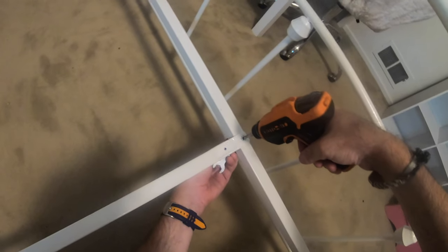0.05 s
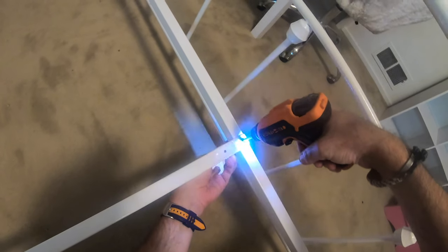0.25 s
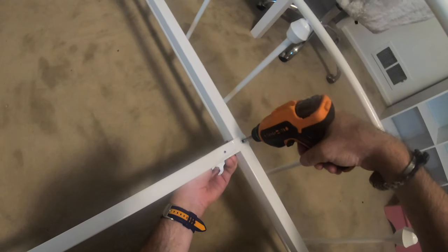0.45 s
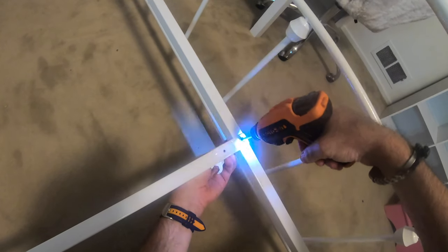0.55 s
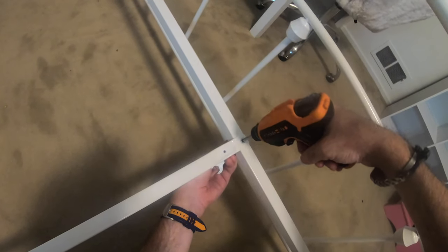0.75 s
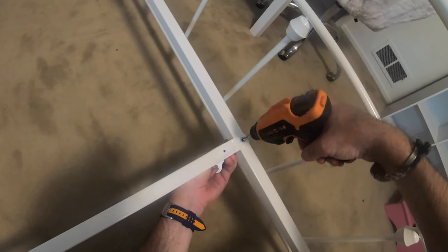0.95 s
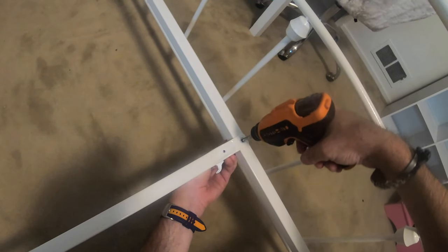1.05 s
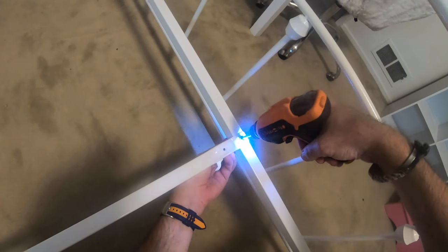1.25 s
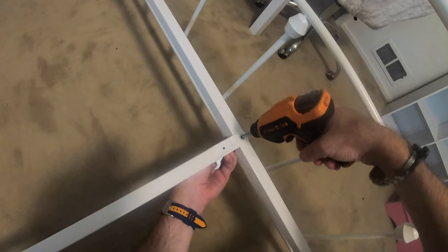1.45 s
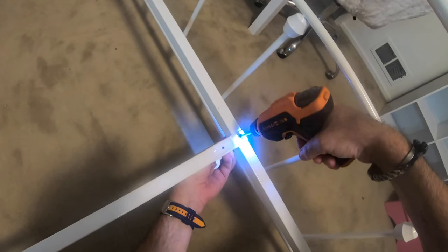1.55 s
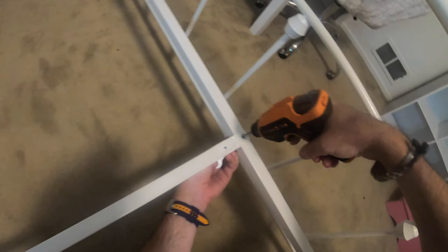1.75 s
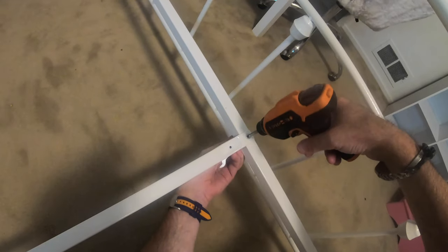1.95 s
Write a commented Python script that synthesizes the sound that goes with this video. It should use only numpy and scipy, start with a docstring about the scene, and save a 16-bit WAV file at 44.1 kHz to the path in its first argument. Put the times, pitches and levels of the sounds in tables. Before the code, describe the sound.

A cordless driver whirs in five short, gritty bursts against a ringing metal frame in a bare room

```python
"""Over a quiet house hush, a tubular frame already rings faintly in a bare room, and a plastic tick leads in.
Five bursts of a cordless driver follow: harmonics of the tooth rate whine and casing-coloured noise grits.
Top speed sinks over the first four as the bolt tightens; the frame rings on, jolts thud near four burst ends.
Ticks, short rings with noise cracks, fall at or between bursts; last come more ticks and a hand's rustle,
two bands of noise. Dense decaying echoes answer the tool throughout."""
import sys
import numpy as np
from scipy import signal
from scipy.fft import rfft, irfft
from scipy.io import wavfile

SR = 44100
rng = np.random.default_rng(int(sys.argv[2]) if len(sys.argv) > 2 else 0)


def master_out(mix):
    """Clip the mix to full scale and print it as 16-bit PCM to the path in sys.argv[1]."""
    frames = np.transpose(np.atleast_2d(mix))
    ceiling = np.clip(frames, -1, 1)
    pcm = np.round(ceiling * 32767).astype(np.int16)
    wavfile.write(sys.argv[1], SR, pcm)


N = 88200  # two seconds

# House hush, relative spectrum: f/Hz, level/dB per Hz
HUSH_SPECTRUM = [(20, -5), (45, -4), (80, -11.5), (110, -8.5), (165, 4.5), (250, 0.5), (420, -18.5),
                 (800, -12), (1520, -2.5), (2200, -6), (2600, -23), (3200, -7), (3950, -24), (12000, -37.5),
                 (16000, -53)]
# Decay of the room echoes: f/Hz, t60/s
ROOM_DECAY = [(150, 1), (400, 0.6), (1040, 0.63), (2760, 0.41), (7280, 0.33), (13000, 0.23)]
# Side of the echoes against their middle: f/Hz, level/dB
ECHO_WIDTH = [(100, -38), (300, -6), (700, -2), (1400, 2), (2800, -6), (5500, -0.5), (9000, 10),
              (14000, 6.5)]
# Stereo placing of everything but the hush, left minus right: f/Hz, level/dB
STEREO_TILT = [(150, -1), (600, -3), (1400, 0), (3000, -2), (6000, -1), (10000, -3), (15000, 0)]
# Hand shifting on the tool: t/s, low band level/dB, high band level/dB
HAND_RUSTLE = [(1.859, -51, -38), (1.894, -102, -81.5), (1.956, -61, -59.5), (1.992, -52, -59),
               (2.0, -51, -72)]
# Trigger and bit ticks, before band-limiting: t/s, ring level/dB, ring f/Hz, crack level/dB
TICK_EVENTS = [(.150, -40.5, 2800, -66), (0.582, -26, 2436, -50), (.893, -32, 2698, -51),
               (1.187, -26.5, 3291, -49.5), (1.4221, -20, 2300, -23), (1.9, -42, 3000, -72),
               (1.938, -33, 2111, -57), (1.951, -35, 3200, -56)]
# The tool jolts the frame near a burst's end: t/s, thud level/dB, low ring level/dB, high ring level/dB
JOLT_EVENTS = [(0.327, -47.5, -49, -72), (.715, -56, -53, -62), (1.0, -64, -55.5, -47.5),
               (1.655, -54, -49, -45.5)]
# Thud, low ring and high ring, each two close modes that beat: f/Hz, spacing f/Hz, t60/s
JOLT_PAIRS = [(89, 35, .15), (162, 3.45, 1.19), (717, 5.903, 1.376)]
# Tube modes of the frame: f/Hz, shaking level/dB, t60/s, level/dB still ringing at the start
TUBE_MODES = [(240.7, -56, 0.24, -86), (334.3, -68.5, 0.65, -75), (561.5, -77, 0.97, -67),
              (590.4, -62, 0.34, -85), (742, -67, 0.68, -71), (813, -60.5, 0.54, -58),
              (1070, -69.5, 1, -72), (1290, -77, 0.49, -61), (1513, -77, 1, -67), (1580, -58, 0.71, -59),
              (1708, -59.5, 0.31, -56.5), (1812, -68, 0.44, -64), (1980, -76, 1, -60),
              (2225, -81.5, .45, -75), (3403, -68.5, 0.96, -62.5), (3300, -76, 0.77, -71)]
# Grit through the casing, relative spectrum: f/Hz, level/dB per Hz
CASING_SPECTRUM = [(88, -37), (150, -19), (221, -23.5), (1110, -3.5), (1240, -4), (1400, 0), (1980, 5),
                   (2360, -1), (3980, -5), (5540, -10), (7860, -13.5), (15500, -47)]
# Tooth harmonics through the casing, relative: f/Hz, level/dB
WHINE_SPECTRUM = [(500, -11), (900, -8.5), (1400, 0.5), (2000, 9.5), (2700, 0.5), (3300, -4.5), (4100, 0.5),
                  (4800, -13), (6000, -37), (9000, -22)]
# One list per burst: t/s, tooth rate f/Hz, whine level/dB, grit level/dB between 5 and 9 kHz
DRIVER_BURSTS = [
    [(0.215, 607, -48, -54), (0.225, 638.4, -26, -65), (0.235, 702.8, -32, -39.5), (0.253, 872.7, -20, -37),
     (0.269, 963, -20, -33), (0.293, 1017, -25, -29.5), (0.315, 1008, -18, -33.5), (0.349, 964, -25, -31.5),
     (0.368, 967, -29, -40.5)],
    [(0.582, 517.5, -47, -51.5), (0.598, 582.5, -31, -52), (0.608, 624, -27, -35), (0.62, 744, -21, -38),
     (0.63, 823.4, -27, -30.5), (0.65, 872.7, -24.5, -32), (0.682, 850.9, -19.5, -31.5),
     (0.692, 853.5, -22, -36), (0.702, 840, -25, -45)],
    [(0.893, 537, -35, -63), (0.899, 570.4, -37, -59), (0.911, 600.8, -29, -41.5), (0.927, 690.3, -24, -36),
     (0.939, 743.5, -24.5, -33.5), (0.959, 747.4, -21, -33), (0.969, 738.7, -21, -34.5),
     (0.977, 723, -14.5, -33.5), (1.003, 727, -37, -37)],
    [(1.249, 410.6, -28, -39), (1.259, 501, -24.5, -43.5), (1.273, 594.1, -20.5, -37.5),
     (1.279, 632.9, -30, -31), (1.285, 646.4, -12, -32.5), (1.305, 652.7, -24.5, -36.5),
     (1.319, 635.4, -14, -36), (1.335, 598.2, -22, -34), (1.357, 583.1, -30.5, -42)],
    [(1.607, 430, -52, -46), (1.615, 467.3, -30.5, -31.5), (1.623, 515.8, -21.5, -43),
     (1.633, 580, -23.5, -33), (1.645, 662.5, -23.5, -31), (1.661, 632.2, -17.5, -39),
     (1.673, 642.9, -39, -38)],
]

HUSH_DB, HUSH_SIDE_DB = -59, -0.5  # the middle; the side against it
ROOM_DB, ROOM_ONSET_S = -9, 0.0095
EARLY_DB, EARLY_T60_S = -10.5, 0.07  # floor and frame close by
WHINE_ROOM_DB = -4  # the whine reaches the room weaker than the grit
TICK_T60_S, CRACK_T60_S, TICK_LOW_HZ, TICK_HIGH_HZ = .004, .035, 1200, 7500
TICK_SAMPLES = 1500
SHAKE_NOISE_DB, SHAKE_TEETH_DB = -1.5, -3
START_S, STOP_S = .004, .011  # linear fade-in; time constant of the fall
JITTER_TEETH, JITTER_HZ = .012, 293
SLOW_JITTER_TEETH = .09  # extra unevenness per octave under the burst's top speed
THROB_DB, THROB_HZ = 1.5, 90  # shared by whine and grit
WAVER_DB, WAVER_HZ = 3, 60  # separate for each harmonic
UNEVEN_DB = 2  # grit strength from tooth to tooth
LOW_CUT_HZ = 148  # tool and thin tubes radiate little lower; the jolts bypass this
CUTOFF_HZ = 15900


def amp(db):
    """Turn decibels into a gain."""
    return 10 ** (np.asarray(db) / 20)


def rms_one(x):
    """Bring a signal to an RMS of one."""
    return x / np.sqrt(np.mean(x ** 2) + 1e-20)


def at_hz(points, hz):
    """Read a curve of value against pitch, straight on a log-frequency axis."""
    point_hz, value = np.array(points).T
    return np.interp(np.log(hz + 1), np.log(point_hz), value)


def colour(x, db_of_hz):
    """Minimum-phase filter with the given dB response: nothing sounds early."""
    log_gain = db_of_hz(np.fft.rfftfreq(4096, 1 / SR)) * np.log(10) / 20
    cepstrum = irfft(log_gain)
    # fold the backward half of the cepstrum onto the forward half
    cepstrum[1:2048] *= 2
    cepstrum[2049:] = 0
    impulse = irfft(np.exp(rfft(cepstrum)))
    return signal.fftconvolve(x, impulse)[:len(x)]


def drift(hz):
    """Smooth random wandering of RMS one: noise through two low-pass poles."""
    r = np.exp(-2 * np.pi * hz / SR)
    noise = rng.standard_normal(N + 4000)
    return rms_one(signal.lfilter([1], [1, -2 * r, r * r], noise)[4000:])


def ring(x, hz, t60):
    """Two-pole resonator: a unit click sets a decaying sine of height 1 ringing."""
    r, w = amp(-60 / (t60 * SR)), 2 * np.pi * hz / SR
    return signal.lfilter([0, np.sin(w)], [1, -2 * r * np.cos(w), r * r], x + 1e-18)


def band(x, lo_hz, hi_hz):
    """Keep the sound between two pitches."""
    return signal.sosfilt(signal.butter(2, [lo_hz, hi_hz], "band", fs=SR, output="sos"), x)


def house_hush():
    """Quiet steady hush of the house: coloured noise, unrelated in middle and side."""
    mid, side = (rms_one(colour(rng.standard_normal(N + 4096), lambda f: at_hz(HUSH_SPECTRUM, f))[4096:])
                 for _ in range(2))
    return amp(HUSH_DB) * (mid + amp(HUSH_SIDE_DB) * side * [[1], [-1]])


def reflect(x, echo, db):
    """Play a sound through middle and side echoes, scaled to one mean energy."""
    echo = amp(db) * echo / np.sqrt(np.sum(echo ** 2) / 2)
    return signal.fftconvolve(x[None], echo, axes=1)[:, :N]


def room(x):
    """Dense echoes, unrelated in middle and side, dying faster in the treble."""
    t = np.arange(SR) / SR
    edges = 80 * 2 ** np.arange(0, 8.1, .5)  # half-octave bands
    noise = rng.standard_normal((2, 2, SR))  # neighbouring bands take turns between two noises
    tail = 0
    for k, (lo, hi) in enumerate(zip(edges, edges[1:])):
        decay = amp(-60 * t / at_hz(ROOM_DECAY, np.sqrt(lo * hi)))
        tail = tail + band(noise[k % 2], lo, hi) * decay
    # silent for one onset time, then fading in over another
    tail = tail * np.clip(t / ROOM_ONSET_S - 1, 0, 1)
    return reflect(x, tail, ROOM_DB)


def early(x):
    """First reflections: two unrelated decaying noise patterns, for middle and side."""
    t = np.arange(SR // 20) / SR
    echo = rng.standard_normal((2, len(t))) * amp(-60 * t / EARLY_T60_S) * (t > .0006)
    return reflect(x, echo, EARLY_DB)


def rustle():
    """A hand shifts on the tool at the end: a low and a high band of rubbing noise."""
    s, low_db, high_db = np.transpose(HAND_RUSTLE)
    t = np.arange(N) / SR
    fade = np.clip((t - s[0]) / 0.058, 0, 1)
    noise = rng.standard_normal((2, N))
    low = amp(np.interp(t, s, low_db)) * rms_one(band(noise[0], 180, 300))
    flicker_db = 2.2 * drift(59.5)
    high = amp(np.interp(t, s, high_db) + flicker_db) * rms_one(band(noise[1], 2186, 4540))
    return fade * (low + high)


def ticks():
    """Plastic ticks: a click sets off a short ring, with a decaying noise crack."""
    out, click = np.zeros(N), np.arange(TICK_SAMPLES) == 0
    t = np.arange(TICK_SAMPLES) / SR
    for s, db, hz, crack_db in TICK_EVENTS:
        crack = rng.standard_normal(TICK_SAMPLES) * amp(crack_db - 60 * t / CRACK_T60_S)
        tick = amp(db) * ring(click, hz, TICK_T60_S) + crack
        tick = band(tick, TICK_LOW_HZ, TICK_HIGH_HZ)
        i = int(s * SR)
        out[i:i + TICK_SAMPLES] += band(tick, TICK_LOW_HZ / 2, 8945)
    return out


def jolts():
    """A dull thud and two tube rings, each a pair of modes that swells and sinks by beating."""
    s, *levels = np.transpose(JOLT_EVENTS)
    out = 0
    for db, (hz, beat_hz, t60) in zip(levels, JOLT_PAIRS):
        push = np.zeros(N)
        push[(s * SR).astype(int)] = amp(db)
        out = out + ring(push, hz, t60) - ring(push, hz + beat_hz, t60 / 2)
    return out


def frame(motor):
    """Tube modes take up the shaking and ring on; they already ring faintly at the start."""
    rough = np.abs(motor) * rng.standard_normal(N)
    shake = amp(SHAKE_NOISE_DB) * rough + amp(SHAKE_TEETH_DB) * motor
    out = 0
    for hz, db, t60, start_db in TUBE_MODES:
        push = amp(db) * shake
        push[0] = amp(start_db)
        out = out + ring(push, hz, t60)
    return out


def driver():
    """Teeth knock in step with the speed, a gliding harmonic stack; grit rubs along. Returns whine and grit."""
    t, rows = np.arange(N) / SR, np.vstack(DRIVER_BURSTS)
    hz, whine_db, grit_db = (np.interp(t, rows[:, 0], column) for column in rows.T[1:])
    gate = 0
    for burst in DRIVER_BURSTS:
        start = np.clip((t - burst[0][0]) / START_S, 0, 1)
        gate = gate + start * np.exp(-np.maximum(t - burst[-1][0], 0) / STOP_S)
    throb = gate * amp(THROB_DB * drift(THROB_HZ))

    # running count of teeth, more uneven below the burst's top speed
    burst_tops = np.concatenate([[max(row[1] for row in b)] * len(b) for b in DRIVER_BURSTS])
    top_hz = np.interp(t, rows[:, 0], burst_tops)
    unevenness = JITTER_TEETH + SLOW_JITTER_TEETH * np.log2(top_hz / hz)
    teeth = np.cumsum(hz) / SR + unevenness * drift(JITTER_HZ)

    sizes = [amp(at_hz(WHINE_SPECTRUM, k * hz)) for k in range(1, 12)]
    whine = 0
    for k, size in enumerate(sizes, 1):
        waver = amp(WAVER_DB * drift(WAVER_HZ))
        phase = 2 * np.pi * (k * teeth + 0.13 * drift(17.6))
        whine = whine + size * waver * np.cos(phase)
    whine = whine / np.sqrt(np.sum(np.square(sizes), axis=0) / 2)  # level without the waver

    tooth_strength = amp(UNEVEN_DB * rng.standard_normal(4000))
    strength = tooth_strength[np.clip(teeth.astype(int), 0, 3999)]
    grit = colour(rng.standard_normal(N) * strength, lambda f: at_hz(CASING_SPECTRUM, f))
    grit = grit / band(grit, 5000, 9000).std()
    return throb * amp(whine_db) * whine, throb * amp(grit_db) * grit


def scene():
    """Mix the tool and frame with their echoes, place them in stereo and lay in the hush."""
    whine, grit = driver()
    rest = grit + frame(whine + grit) + ticks() + rustle()
    low_cut = signal.butter(6, LOW_CUT_HZ, "high", fs=SR, output="sos")
    whine, rest = signal.sosfilt(low_cut, [whine, rest])
    mid, side = early(whine + rest) + room(amp(WHINE_ROOM_DB) * whine + rest)
    side = colour(side, lambda f: at_hz(ECHO_WIDTH, f))
    heard = whine + rest + jolts() + mid + side * [[1], [-1]]
    # each ear takes half of the left-right difference
    placed = [colour(x, lambda f: sign * at_hz(STEREO_TILT, f) / 2) for x, sign in zip(heard, (1, -1))]
    return np.array(placed) + house_hush()


def record(dry):
    """A steep low-pass cuts the top."""
    return signal.sosfilt(signal.cheby2(12, 70, CUTOFF_HZ, fs=SR, output="sos"), dry)


dry = scene()
out = record(dry)
master_out(out)
```